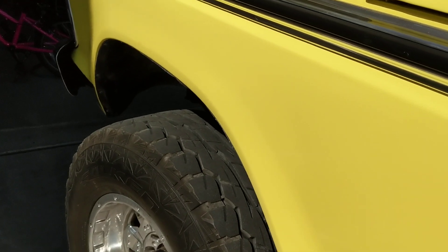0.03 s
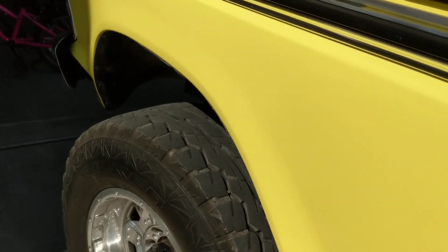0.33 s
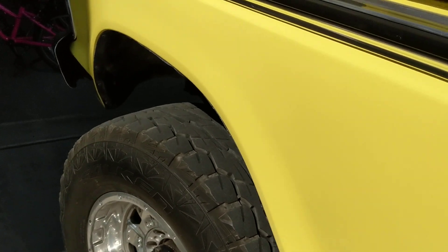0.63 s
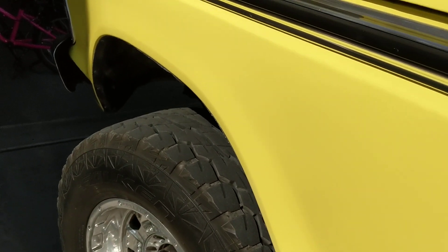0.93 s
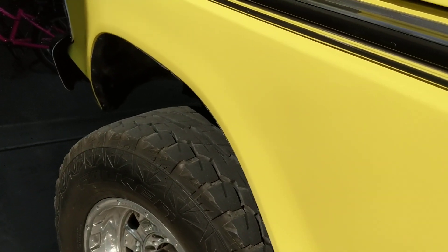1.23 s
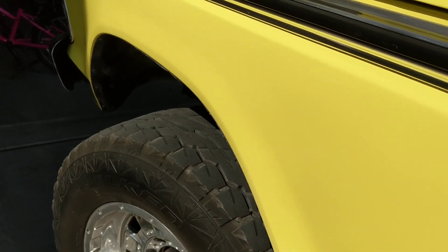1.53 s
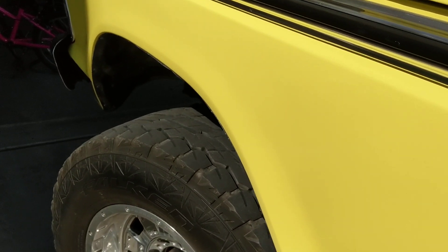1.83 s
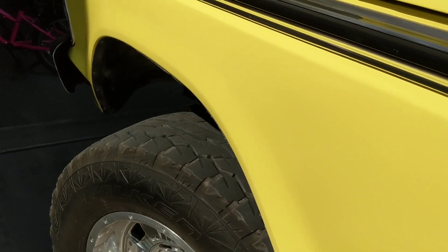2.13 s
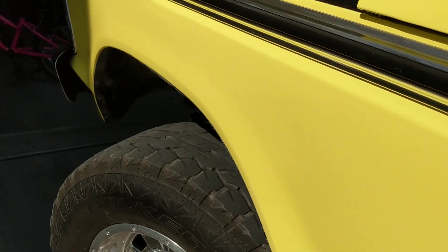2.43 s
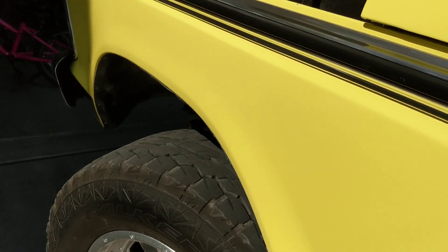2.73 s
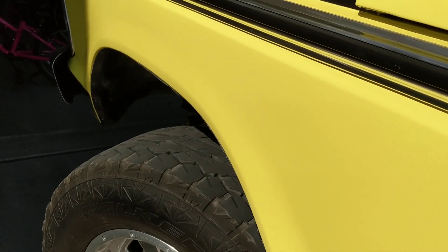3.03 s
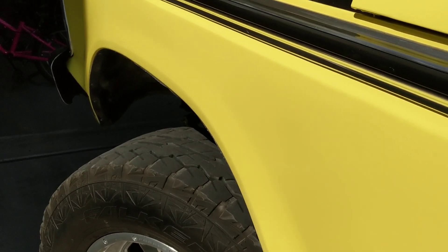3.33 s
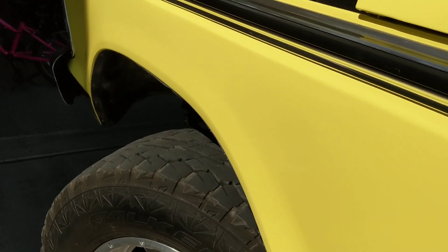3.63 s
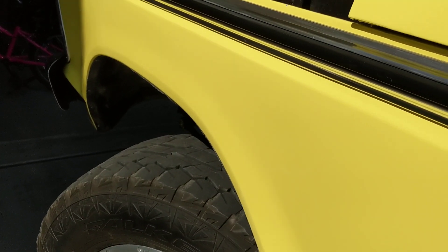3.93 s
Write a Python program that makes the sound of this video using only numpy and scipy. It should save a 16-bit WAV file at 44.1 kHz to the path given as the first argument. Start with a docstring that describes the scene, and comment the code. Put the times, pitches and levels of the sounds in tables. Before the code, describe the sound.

A high, steady squeal sounds three times from a truck's suspension in a quiet workshop, mixed with raspy hissing and two faint ticks. After the first squeal, low gusts rumble and knock against the microphone.

```python
"""Pickup suspension squealing in a workshop

A pickup's body rises slowly over its wheel in three bursts, with a loud squeal, probably from an air
valve in the suspension. The steady whistle and its overtones break into a hoarse rasp at the start, at
the end and now and then in between, and the suspension ticks twice. One microphone, with a little room
around the squeal; from the second burst on, wind bumps on it over the quiet workshop background."""
import sys
import numpy as np
from scipy import signal
from scipy.fft import rfft, irfft
from scipy.io import wavfile
from scipy.ndimage import uniform_filter1d

SR = 44100
rng = np.random.default_rng(int(sys.argv[2]) if len(sys.argv) > 2 else 0)


def master(y):
    """Save y as 16-bit WAV."""
    cut = np.clip(np.atleast_2d(y).T, -1, 1)
    pcm = np.round(cut * 32767)  # scale
    wavfile.write(sys.argv[1], SR, pcm.astype(np.int16))


N = 176400

# colour of the workshop background: frequency_hz, density_db
WORKSHOP_SPECTRUM = [(15, -42), (30, -16.5), (55, 2.5), (120, 0), (190, 0), (270, -13.5), (340, -6.5),
                     (450, -14.5), (700, -16.5), (1300, -16), (2000, -23), (3200, -28.5), (4500, -24.5),
                     (7000, -34.5), (15500, -40.5)]

# strength of the hoarse flow, one table per burst: time_s, level_db
HOARSE_FLOW_1 = [(0.0, -63), (0.036, -59), (0.088, -46.5), (0.14, -54), (0.158, -39.5), (0.244, -36.5),
                 (0.404, -82), (0.844, -69), (0.862, -38), (0.9, -35), (0.936, -48), (1.1, -77.5)]
HOARSE_FLOW_2 = [(1.224, -37.5), (1.246, -38.5), (1.424, -72), (1.47, -53), (1.512, -42), (1.682, -72.5),
                 (1.868, -80), (2.25, -59.5), (2.335, -67), (2.354, -41.5), (2.382, -37), (2.5, -83.5)]
HOARSE_FLOW_3 = [(2.808, -36.5), (2.837, -34), (2.897, -57.5), (2.941, -36.5), (3.045, -35.5), (3.067, -52),
                 (3.099, -37), (3.18, -38), (3.304, -36.5), (3.338, -58.5), (3.687, -67), (3.728, -38),
                 (4.0, -38)]
# spans in which the valve whistles: start_s, end_s, overtone_gain_db
WHISTLE_BURSTS = [(-0.05, 0.863, 0.5), (1.24, 2.364, -1), (2.835, 3.728, -2)]
# pitch of the whistle, one table per burst: time_s, pitch_hz
WHISTLE_PITCH_1 = [(0.02, 1081), (0.106, 1124), (0.246, 1102), (0.396, 1140), (0.624, 1122), (0.724, 1105),
                   (0.86, 1065)]
WHISTLE_PITCH_2 = [(1.25, 1118), (1.354, 1101), (1.433, 1080), (1.542, 1102), (1.638, 1122), (1.823, 1090),
                   (1.879, 1084), (1.958, 1104), (2.096, 1076), (2.25, 1126), (2.345, 1100), (2.36, 1097)]
WHISTLE_PITCH_3 = [(2.841, 1116), (2.89, 1132), (2.97, 1119), (3.06, 1140), (3.18, 1117), (3.269, 1118),
                   (3.34, 1122), (3.43, 1098), (3.519, 1079), (3.582, 1083), (3.65, 1097), (3.72, 1086)]
# the whistle's fundamental, one table per burst: time_s, level_db
WHISTLE_LEVEL_1 = [(0.0, -35.5), (0.046, -28), (0.145, -21.5), (0.162, -35.5), (0.24, -28.5), (0.352, -19),
                   (0.385, -29), (0.404, -21.5), (0.506, -24.5), (0.54, -30.5), (0.656, -21.5),
                   (0.698, -32.5), (0.735, -25), (0.758, -31), (0.775, -26), (0.824, -27), (0.86, -35)]
WHISTLE_LEVEL_2 = [(1.23, -37), (1.248, -31), (1.38, -32.5), (1.418, -27), (1.56, -31), (1.672, -20.5),
                   (1.738, -31.5), (1.771, -26.5), (2.197, -29), (2.242, -22), (2.3, -22.5), (2.315, -29.5),
                   (2.322, -45.5), (2.332, -29), (2.36, -32)]
WHISTLE_LEVEL_3 = [(2.82, -29), (2.86, -24), (2.9, -23.5), (2.987, -38), (3.072, -24.5), (3.12, -34),
                   (3.144, -25), (3.262, -33), (3.316, -22), (3.366, -20.5), (3.404, -28.5), (3.528, -31.5),
                   (3.557, -27.5), (3.72, -34)]
# overtones at both ends of the pitch range: multiple, low_pitch_level_db, high_pitch_level_db
WHISTLE_OVERTONES = [(2, -48, -46.5), (3, -56.5, -53.5), (4, -54.5, -56.5), (5, -61, -66),
                     (6, -62.5, -60.5), (7, -62, -65.5), (8, -63.5, -65), (9, -64, -71.5), (10, -73.5, -70),
                     (11, -73.5, -71.5), (12, -73.5, -78.5), (13, -80.5, -78), (14, -76, -84.5)]
# bright flares of the whistle: centre_s
FLARES_S = [0.02, 0.33, 1.98, 2.88, 3.529]

# resonances of the valve in the rasp: pitch_hz, width_hz, gain_db
VALVE_MODES = [(816, 16, -11), (930, 16, -17.5), (1070, 126, 4), (1283, 57, 4), (1435, 52, 0.5),
               (1574, 65, -3)]
# air that drives them, hiss with the rasp, thin leak with the whistle: frequency_hz, density_db
FLOW_SPECTRUM = [(500, -26), (800, -10.0), (1100, 15), (1550, 4), (1900, -2), (4000, -42)]
HISS_SPECTRUM = [(500, -5.5), (1000, 5.5), (1700, 9), (2300, 5), (3200, -0.5), (4400, -0.5), (6000, -8.5),
                 (9000, -9.5), (12000, -18.5), (15500, -21)]
LEAK_SPECTRUM = [(1500, -13), (4500, -14.5), (9000, -10.5), (15500, -25)]

# sharp ticks from the suspension: start_s, level_db
SUSPENSION_TICKS = [(0.178, -43), (3.518, -46)]
# colour of a tick: frequency_hz, density_db
TICK_SPECTRUM = [(1500, 15.5), (4500, 3), (9000, 7), (15500, -4.5)]

# wind at the microphone: time_s, strength_db
WIND_GUSTS = [(1.33, -64), (1.41, -26), (1.44, -38), (1.52, -26), (1.59, -45), (1.635, -37), (1.73, -39.5),
              (1.78, -28), (1.84, -39.5), (1.89, -49), (1.99, -56), (2.04, -41), (2.1, -54), (2.19, -51),
              (2.215, -29), (2.245, -51), (2.28, -30), (2.42, -58.5), (2.48, -35), (2.56, -49), (2.64, -41),
              (2.79, -30), (2.89, -30), (2.94, -37.5), (3.01, -33), (3.08, -26), (3.22, -29), (3.26, -43),
              (3.29, -34), (3.4, -51), (3.48, -34), (3.53, -52.5), (3.65, -62), (3.68, -38), (3.82, -32),
              (3.96, -48.5), (4.0, -52)]
# its rumble, and what the hardest gusts add: frequency_hz, density_db
WIND_SPECTRUM = [(25, -37), (45, -3), (70, 4), (110, 1), (160, -8), (250, -17), (400, -51.5), (4000, -73)]
HARD_GUST_SPECTRUM = [(100, -36), (210, 13.5), (330, -0.5), (500, -12), (900, -44), (4000, -83)]
# single eddies that knock on the microphone: centre_s, peak_db, pitch_hz
MIC_BUFFETS = [(1.404, -24, 100), (1.465, -20.5, 146), (1.513, -18.5, 127), (1.76, -20, 158),
               (2.141, -19.5, 116), (2.813, -17, 99), (2.866, -20.5, 101), (3.028, -22, 265),
               (3.069, -13.5, 126), (3.102, -14.5, 96), (3.122, -20, 230), (3.21, -20, 149)]


def from_db(db):
    """Decibels to gain."""
    return 10 ** (np.asarray(db) / 20)


def rms_one(x):
    """Scale to rms 1."""
    return x / np.sqrt(np.mean(x ** 2) + 1e-20)


def seconds():
    """Time of every sample."""
    return np.arange(N) / SR


def in_time(rows):
    """Join (time_s, value) rows by straight lines."""
    return np.interp(seconds(), *np.transpose(rows))


def drift(rate_hz):
    """Smooth random wander with a spread of 1."""
    step, settling = 20, 2000
    pole = np.exp(-2 * np.pi * step * rate_hz / SR)
    white = rng.standard_normal(N // step + settling + 2)
    slow = signal.lfilter([1], [1, -2 * pole, pole * pole], white)[settling:]
    return np.interp(np.arange(N) / step, np.arange(len(slow)), rms_one(slow))


def noise(spectrum):
    """Noise of rms 1, coloured by (frequency_hz, density_db) rows."""
    hz, db = np.transpose(spectrum)
    bins_hz = np.maximum(np.arange(N // 2 + 1) * SR / N, 1)
    colour = from_db(np.interp(np.log(bins_hz), np.log(hz), db))
    return rms_one(irfft(rfft(rng.standard_normal(N)) * colour, N))


def resonate(x, hz, width_hz):
    """Two-pole resonance."""
    radius = np.exp(-np.pi * width_hz / SR)
    return signal.lfilter([1, 0, -1], [1, -2 * radius * np.cos(2 * np.pi * hz / SR), radius ** 2], x)


def even_out(x):
    """Take most of the short swings out of a sound's level; rms 1."""
    power = uniform_filter1d(rms_one(x) ** 2, size=400)
    return rms_one(x / np.sqrt(power + .1))


def in_room(x, wet_db, t60_s=0.62):
    """The direct sound at the microphone, plus the workshop's diffuse tail."""
    t = np.arange(SR) / SR
    tail = rng.standard_normal(SR) * from_db(-60 * t / t60_s)
    return x + from_db(wet_db) * signal.fftconvolve(x, tail / np.linalg.norm(tail))[:N]


def workshop(level_db=-49):
    """Quiet, steady room tone, mostly bass."""
    return from_db(level_db) * noise(WORKSHOP_SPECTRUM)


def hoarse_flow_db(opening_s=.007):
    """Level of the valve's hoarse flow; each burst opens within a few milliseconds."""
    t, gain = seconds(), 1e-5
    for rows in (HOARSE_FLOW_1, HOARSE_FLOW_2, HOARSE_FLOW_3):
        start, end = rows[0][0], rows[-1][0]
        opened = np.clip((t - start) / opening_s + .5, 0, 1) * (t <= end)
        gain = gain + opened * from_db(in_time(rows))
    return 20 * np.log10(gain)


def gate(start, end, attack_s=0.0037, release_s=0.012):
    """Attack, hold and release of one burst."""
    t = seconds()
    return np.clip((t - start) / attack_s, 0, 1) * np.clip((end - t) / release_s, 0, 1)


def whistling():
    """1 while the valve whistles, 0 in the pauses."""
    return sum(gate(start, end) for start, end, _ in WHISTLE_BURSTS)


def whistle(flow_db, break_db=-43, flutter_hz=164):
    """The valve sings one tone; hoarse flow above break_db shakes its pitch and makes it chatter."""
    flutter = flutter_amount()
    hoarse = (1 - flutter) / (1 + from_db(2 * (break_db - flow_db)))
    jitter = 0.0016 * drift(108) + 0.0135 * hoarse * drift(181)
    pitch_hz = in_time(WHISTLE_PITCH_1 + WHISTLE_PITCH_2 + WHISTLE_PITCH_3)
    # the flutter swings phase and level together
    beat = 2 * np.pi * np.cumsum(flutter_hz * (1 + 0.027 * drift(30))) / SR
    swing_rad = 0.3 * flutter * (np.sin(beat) + .5 * np.sin(2 * beat))
    throb = 1 + 0.23 * flutter * (np.cos(beat) + .5 * np.cos(2 * beat))
    phase = 2 * np.pi * np.cumsum(pitch_hz * (1 + jitter)) / SR + swing_rad
    level_db = in_time(WHISTLE_LEVEL_1 + WHISTLE_LEVEL_2 + WHISTLE_LEVEL_3)
    chatter_db = 2.2 * hoarse * (drift(70) - .5)
    fundamental = whistling() * from_db(level_db + chatter_db) * np.sin(phase)
    upper = overtones(phase, pitch_hz, hoarse)
    return np.sqrt(2) * (in_room(throb * fundamental, wet_db=-15.5) + in_room(throb * upper, wet_db=-10))


def overtones(phase, pitch_hz, hoarse, low_hz=1082, high_hz=1130):
    """The whistle's overtones shift in balance with pitch; hoarse flow wipes out the highest most."""
    bursts = sum(gate(start, end) * from_db(db) for start, end, db in WHISTLE_BURSTS)
    height = np.clip((pitch_hz - low_hz) / (high_hz - low_hz), 0, 1)
    sound = 0
    for multiple, low_db, high_db in WHISTLE_OVERTONES:
        level_db = (1 - height) * low_db + height * high_db + flare_db(multiple)
        loss_db = hoarse * (6 + 1.2 * multiple)
        sound = sound + bursts * from_db(level_db - loss_db) * waver() * np.sin(multiple * phase)
    return sound


def flare_db(multiple, boost_db=7.5, half_s=.05):
    """Now and then the fourth and fifth harmonics flare up together."""
    flaring = sum(np.exp(-((seconds() - centre) / half_s) ** 2) for centre in FLARES_S)
    return boost_db * flaring * (multiple in (4, 5))


def waver(swell_depth=.28, flicker_db=2.4):
    """Gain of one overtone, which swells, drops out abruptly and flickers on its own; rms about 1."""
    swell = np.hypot(1 + swell_depth * drift(6), swell_depth * drift(6) / 2)
    dropouts = np.tanh((1 - drift(5)) / .35)
    return rms_one(swell * dropouts) * from_db(flicker_db * drift(32))


def rasp(flow_db, full_flow_db=-38, sputter_db=1):
    """Sputtering air rings the valve's resonances and hisses above them."""
    sputter = rms_one(from_db(sputter_db * drift(110)))
    flow = sputter * noise(FLOW_SPECTRUM)
    ringing = sum((-1) ** k * from_db(db) * rms_one(resonate(flow, hz, width_hz))
                  for k, (hz, width_hz, db) in enumerate(VALVE_MODES))
    ringing_db = flow_db + 2.5 - 8.2 * flutter_amount()
    hiss_db = -47 + 0.74 * (flow_db - full_flow_db)   # swings less than the flow
    hiss = sputter * noise(HISS_SPECTRUM) * from_db(hiss_db)
    return in_room(even_out(ringing) * from_db(ringing_db), wet_db=-11.5) + hiss


def leak(level_db=-66):
    """A thin hiss of air while the valve whistles."""
    return noise(LEAK_SPECTRUM) * from_db(level_db) * whistling()


def ticks(crack_s=.004, t60_s=0.17):
    """Bright snaps from the suspension: a crack and a short tail."""
    t, envelope = seconds(), 0
    for start, db in SUSPENSION_TICKS:
        age = np.abs(t - start)
        decay = np.exp(-age / crack_s) + from_db(-60 * age / t60_s)
        envelope = envelope + (t >= start) * from_db(db) * decay
    return envelope * noise(TICK_SPECTRUM)


def wind(lump_db=2.2, full_gust_db=-22):
    """Lumpy low rumble right on the microphone; the hardest gusts reach higher in pitch."""
    gust_db = in_time(WIND_GUSTS) + lump_db * (drift(25) - .5)
    eddies = noise(WIND_SPECTRUM)
    eddies = eddies / np.sqrt(uniform_filter1d(eddies ** 2, size=1500))   # the gusts alone set the level
    rumble = eddies * from_db(gust_db + 2)
    hard_gusts = noise(HARD_GUST_SPECTRUM) * from_db(-22 + 2.66 * (gust_db - full_gust_db))
    blowing = seconds() >= WIND_GUSTS[0][0]
    return blowing * (rumble + hard_gusts)


def buffets(half_s=.008, slowing_s=.06):
    """Single eddies slap the microphone: a swing or two of pressure that slows as it passes."""
    sound = 0
    for centre, db, hz in MIC_BUFFETS:
        t = np.clip(seconds() - centre, -.05, .05)
        cycles = hz * slowing_s * (1 - np.exp(-t / slowing_s)) + rng.random()
        envelope = from_db(db) * np.exp(-(t / half_s) ** 2)
        sound = sound + envelope * np.sin(2 * np.pi * cycles)
    return sound


def flutter_amount(centre_s=1.502, half_s=0.042):
    """Rises to 1 while the whistle flutters briefly in the second burst."""
    return np.exp(-((seconds() - centre_s) / half_s) ** 4)


def scene():
    """Valve, ticks, wind and workshop at one microphone."""
    flow_db = hoarse_flow_db()
    valve = whistle(flow_db) + rasp(flow_db) + leak()
    return (valve + ticks() + wind() + buffets() + workshop())[None]


def record(dry, low_cut_hz=28.5, high_cut_hz=15750):
    """The microphone drops the deepest bass; the top is cut steeply."""
    low_cut = signal.butter(4, low_cut_hz, "high", fs=SR, output="sos")
    high_cut = signal.ellip(12, .1, 80, high_cut_hz, fs=SR, output="sos")
    return signal.sosfilt(high_cut, signal.sosfilt(low_cut, dry))


dry = scene()
out = record(dry)
master(out)
```